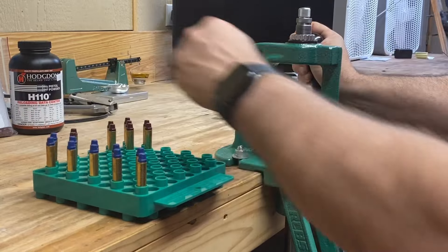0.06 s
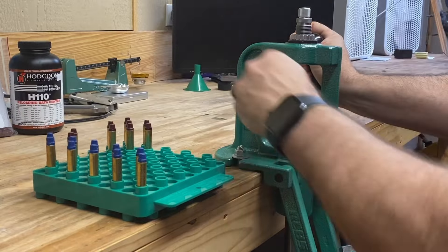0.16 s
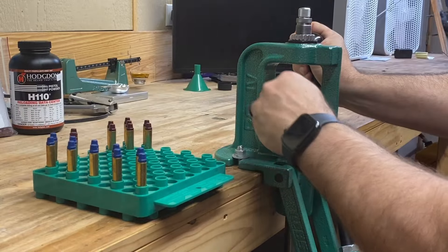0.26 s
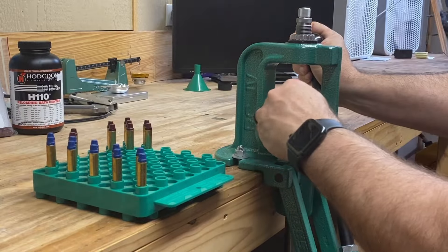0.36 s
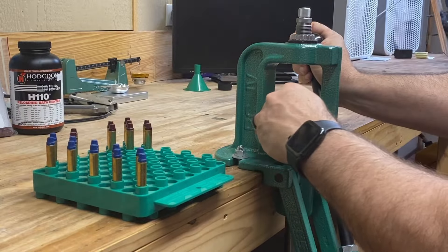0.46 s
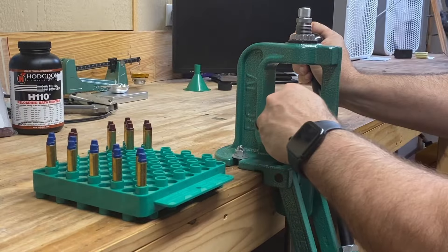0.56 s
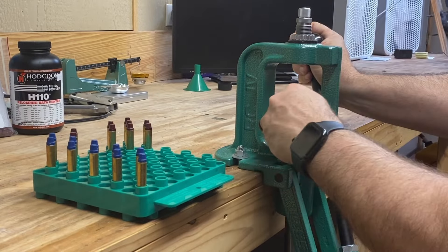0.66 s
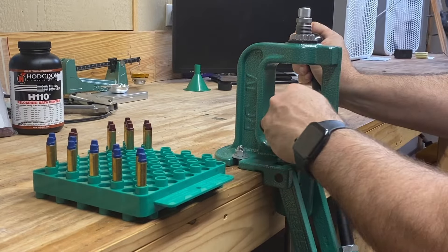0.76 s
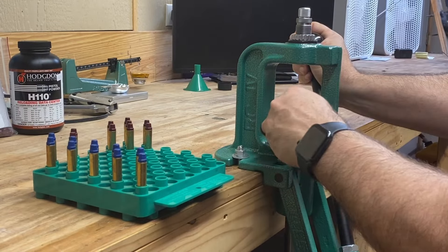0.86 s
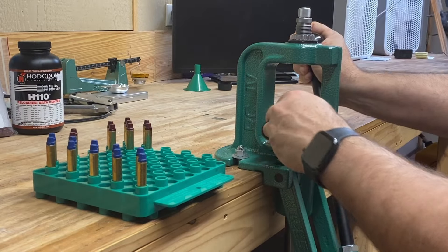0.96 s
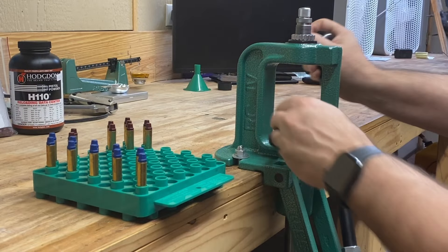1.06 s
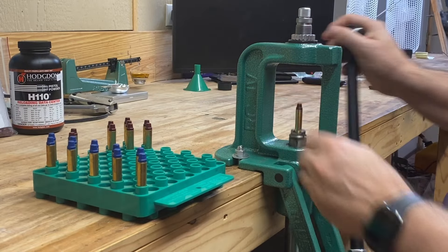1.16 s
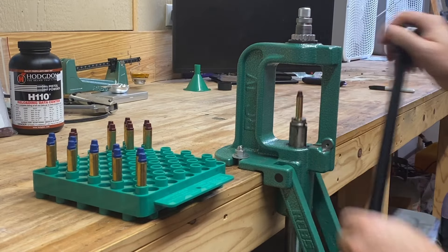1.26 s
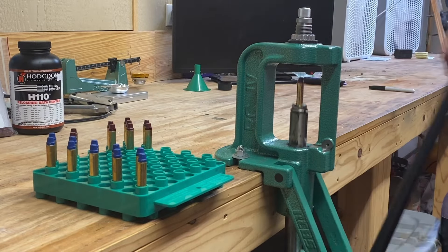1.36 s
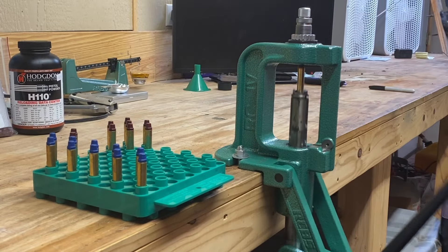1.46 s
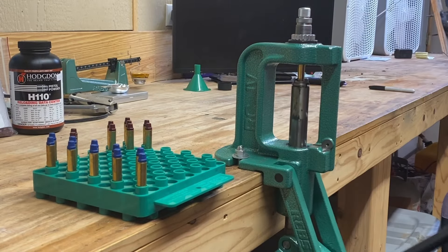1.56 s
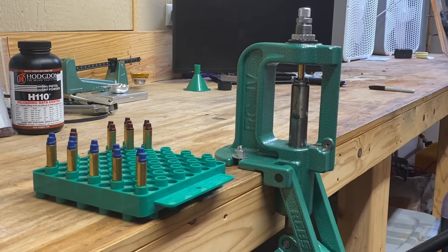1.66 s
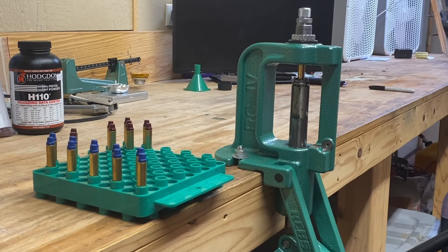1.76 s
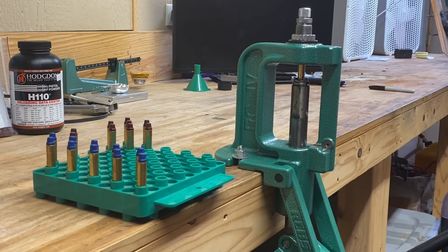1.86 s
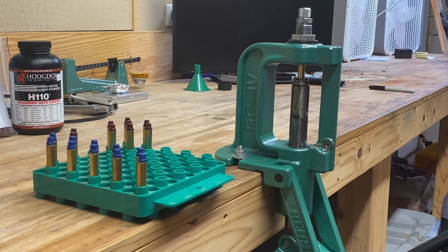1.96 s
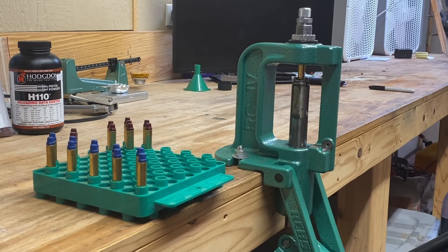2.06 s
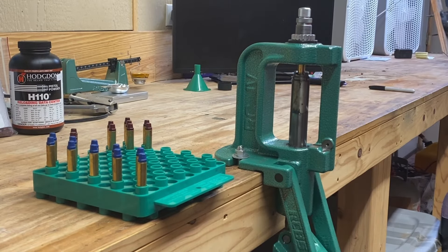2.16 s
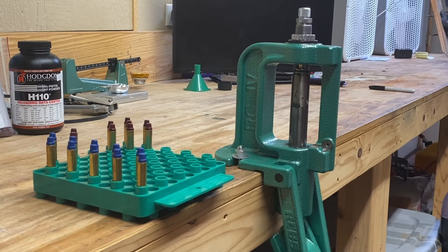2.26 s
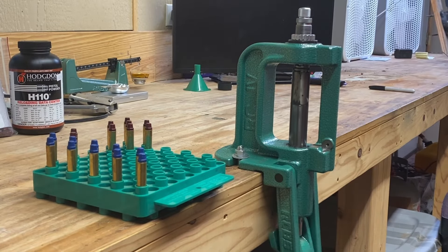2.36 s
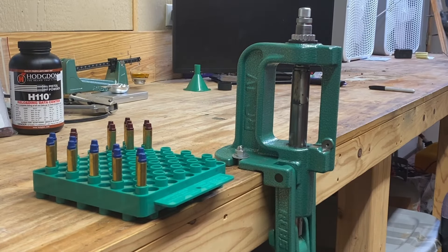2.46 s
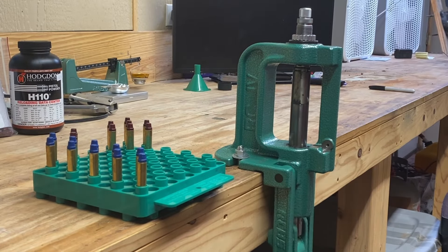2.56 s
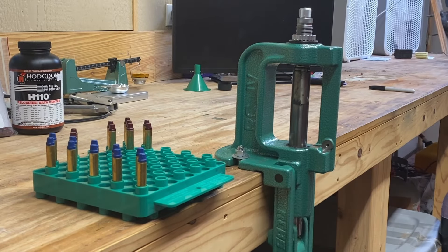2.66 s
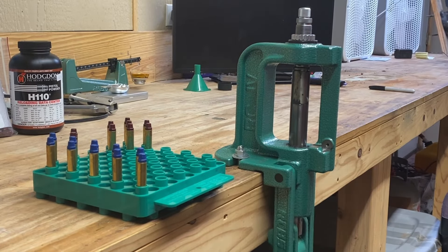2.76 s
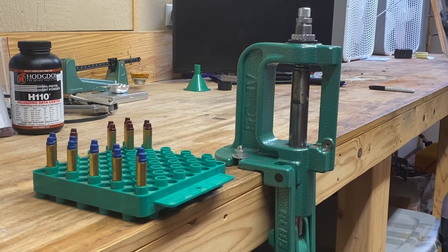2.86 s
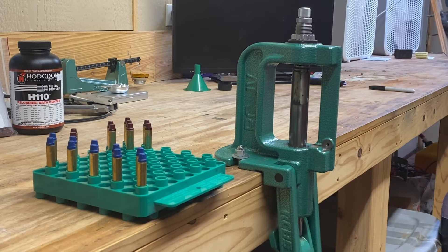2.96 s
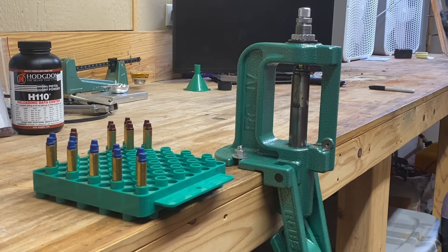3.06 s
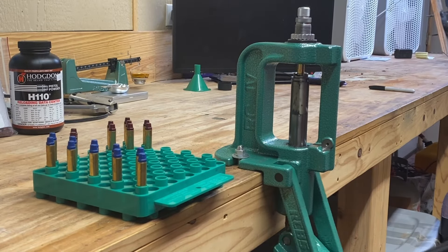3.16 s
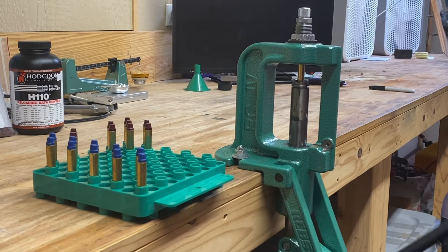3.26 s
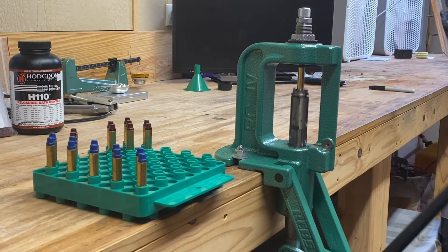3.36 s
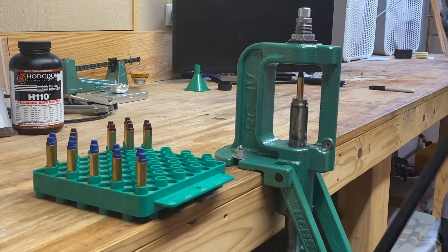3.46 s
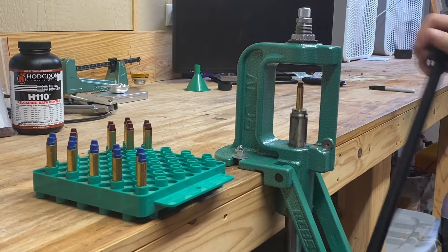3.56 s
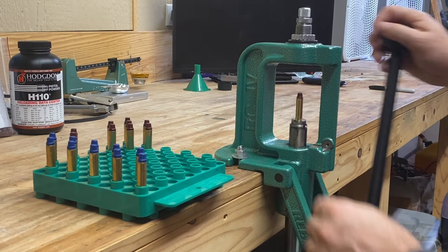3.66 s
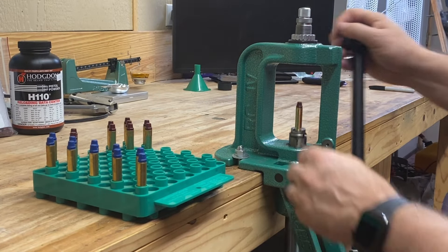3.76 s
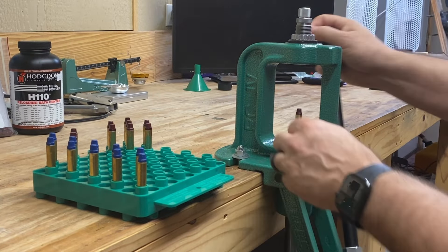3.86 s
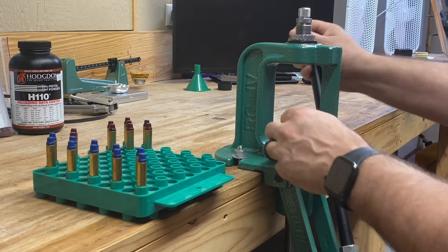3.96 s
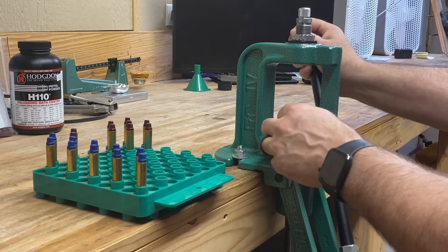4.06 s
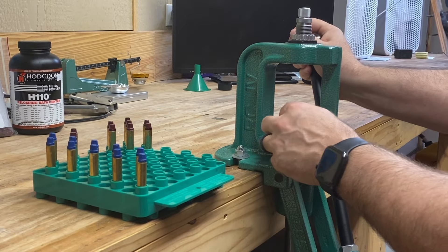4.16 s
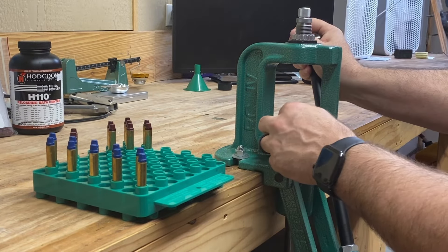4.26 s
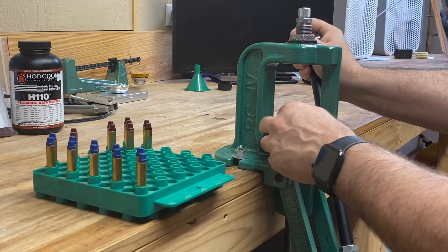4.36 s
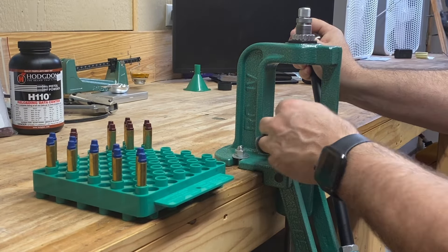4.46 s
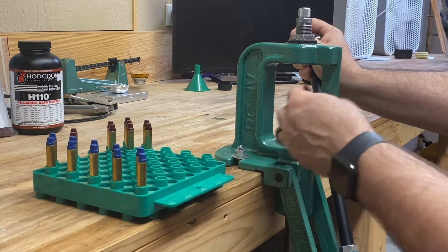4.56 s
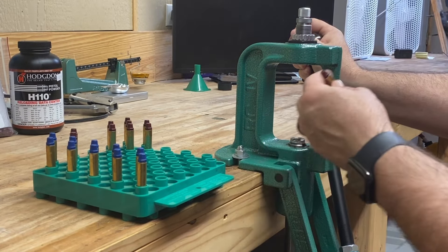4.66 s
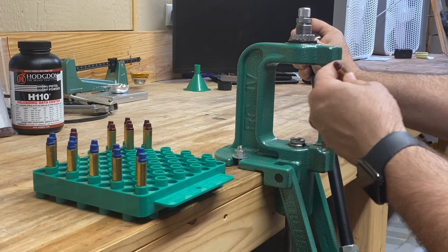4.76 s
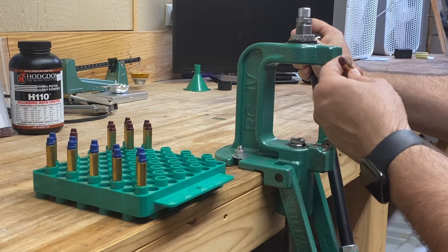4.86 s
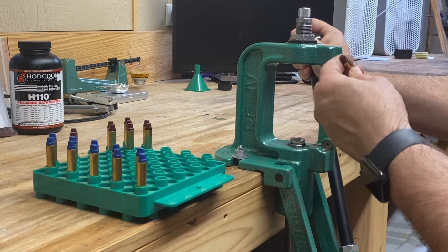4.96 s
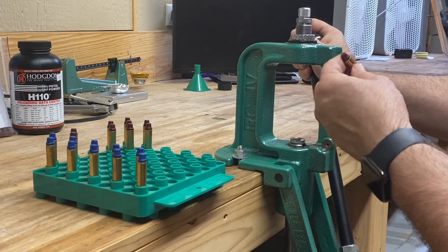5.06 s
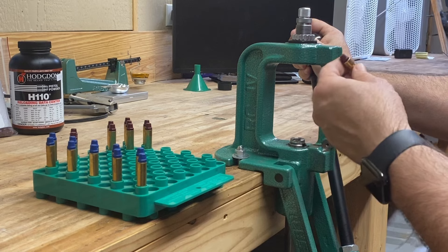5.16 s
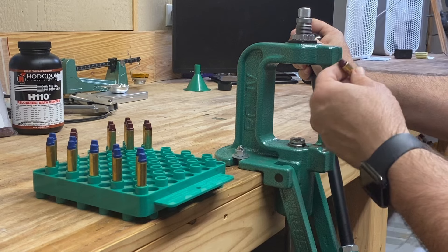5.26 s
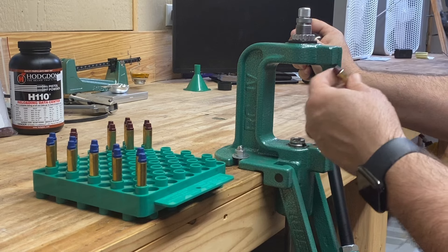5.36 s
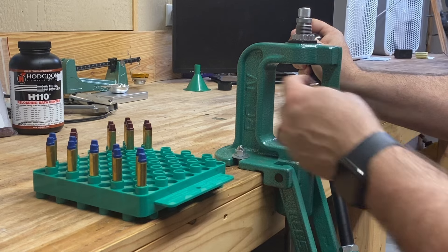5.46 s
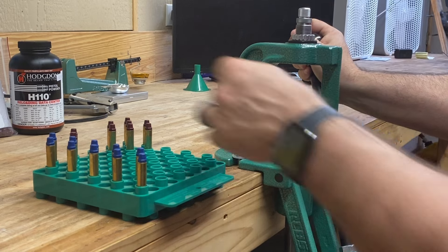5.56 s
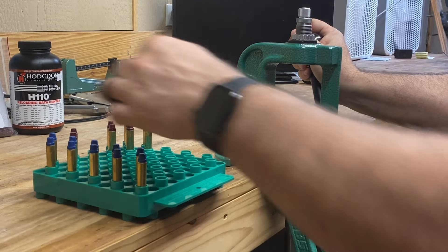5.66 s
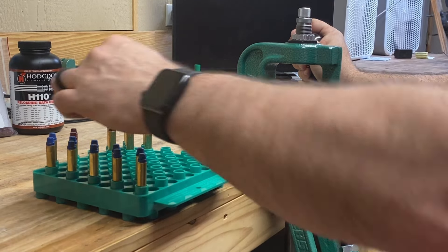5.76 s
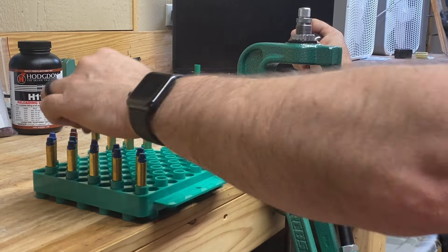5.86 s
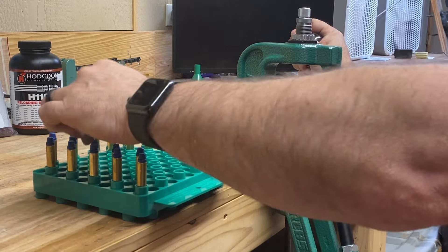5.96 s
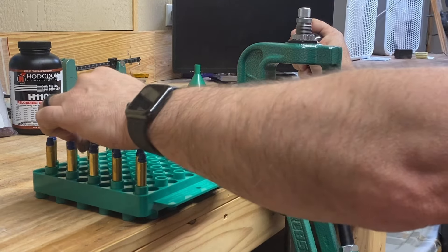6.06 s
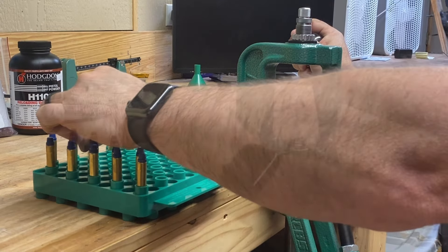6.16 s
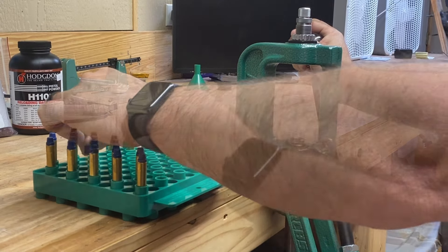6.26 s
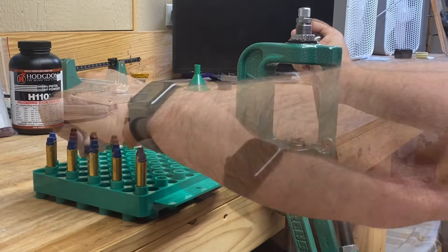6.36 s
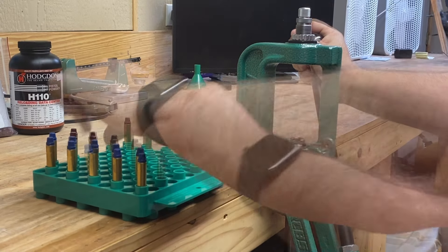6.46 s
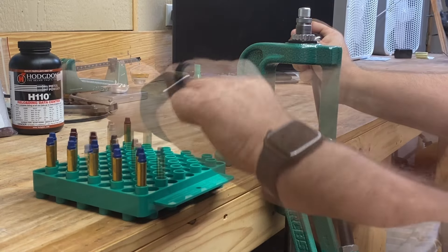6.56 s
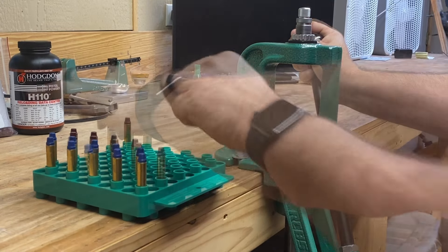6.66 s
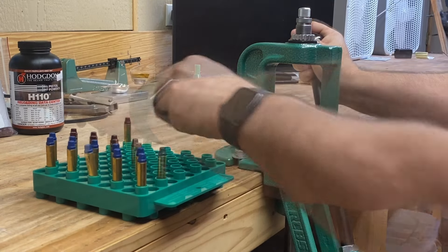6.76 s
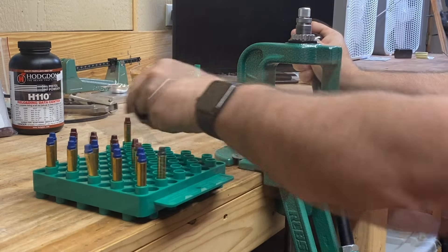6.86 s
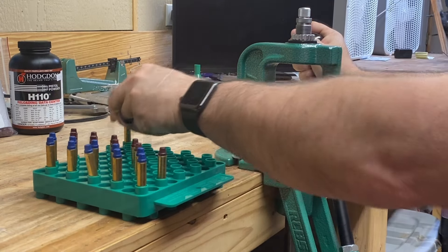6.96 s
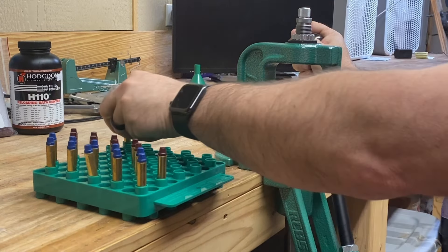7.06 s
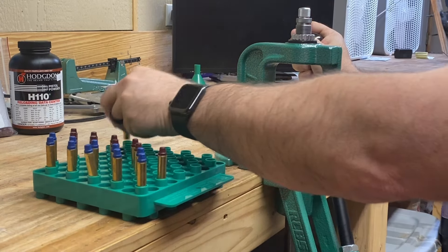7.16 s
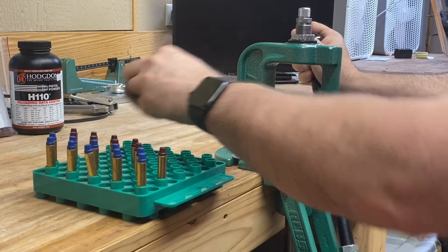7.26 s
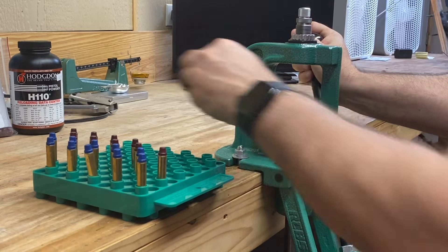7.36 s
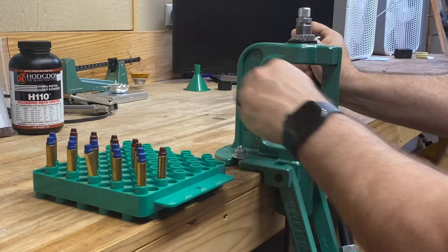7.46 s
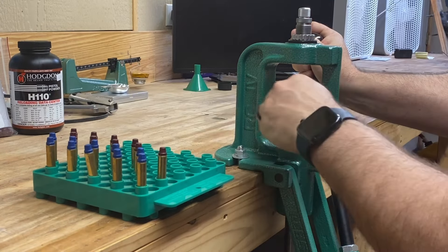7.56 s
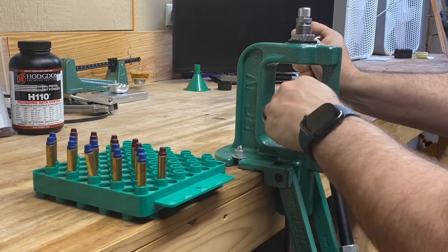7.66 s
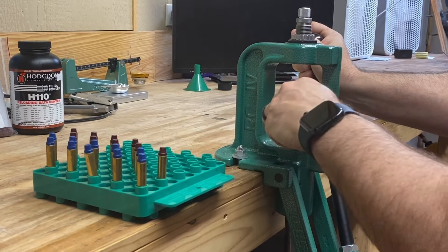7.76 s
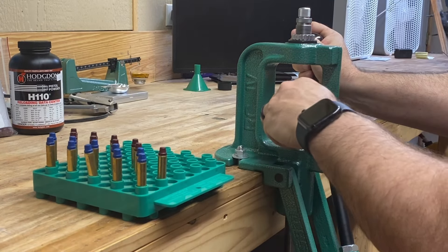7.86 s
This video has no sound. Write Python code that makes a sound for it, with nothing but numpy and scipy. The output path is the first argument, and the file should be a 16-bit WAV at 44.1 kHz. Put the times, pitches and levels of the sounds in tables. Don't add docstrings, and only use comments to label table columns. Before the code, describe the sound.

Close to a wooden bench, light hollow nudges and brass ticks lead into two rounds of loose iron clunking, with dull plank thuds and a barely audible sliding hiss between them. A cartridge case is pulled free with small scrapes, then knocks into a hard plastic tray around six seconds. Soft taps and a last metallic tick end it. A steady fan rumbles throughout in a small, lightly echoing workshop.

```python
import sys
import numpy as np
from scipy import signal
from scipy.fft import rfft, irfft, next_fast_len
from scipy.io import wavfile
from scipy.ndimage import uniform_filter1d

SR = 44100
rng = np.random.default_rng(int(sys.argv[2]) if len(sys.argv) > 2 else 0)


def undo_db(level):
    steps = np.asarray(level, float) / 20
    return 10 ** steps


def digitize_waveform(pressure):
    field = np.atleast_2d(pressure).T
    bounded = np.clip(field, -1, 1)
    quanta = np.round(bounded * 32767).astype(np.int16)
    wavfile.write(sys.argv[1], SR, quanta)


N = 349272
TIME = np.arange(N) / SR

KNOCKS = [(1.053, -35.5, -68, 2440, 10.5), (1.059, -33, -87, 1660, 6), (1.362, -44, -52, 1300, 2),
          (1.600, -44.5, -54.5, 2800, 13), (2.23, -21.5, -52, 790, 8), (2.232, -22.5, -58, 1260, 15),
          (2.264, -43, -70, 807, 14), (2.36, -44, -55.5, 1080, -1), (2.382, -36, -62, 1310, 6),
          (2.441, -44, -77, 730, 10), (2.573, -37, -68, 2220, 12), (2.581, -38, -74, 770, 4),
          (3.162, -19.5, -36.5, 1650, 15.5), (3.156, -23, -36, 2370, 17), (3.209, -29.5, -58, 1250, 11.5),
          (3.224, -17.5, -45, 2200, 10), (3.197, -27, -35.5, 3900, 13.5), (3.256, -29, -40, 2930, 14),
          (3.302, -36.5, -59.5, 2300, 10.5), (3.232, -25, -53, 1250, 13.5), (3.246, -20, -37, 2930, 15.5),
          (3.289, -30, -42, 810, 10), (3.429, -43.5, -60, 840, 6), (3.614, -56.5, -62.5, 2780, 13),
          (3.974, -30, -65, 842, 12), (3.997, -41, -65, 1650, 10), (4.012, -39, -67, 1000, 6)]
SLACK = [
    (1.003, -55, -76, 2270, 13),
    (1.614, -34, -66.5, 1650, 1.9),
    (2.15, -37, -71, 1500, 10),
    (2.169, -42, -65, 834, 10),
    (2.209, -24, -50, 835, 3.7),
    (3.149, -34, -40.5, 3070, 22),
    (3.194, -22.5, -44.5, 820, 9.2),
    (3.55, -51.5, -75, 1760, 7.8),
    (3.969, -32.5, -60.5, 1400, 12),
    (3.984, -36, -77, 1650, 10),
]
TICKS = [(0.461, -39.5, -45, 3050, 1.2), (0.585, -46, -81, 1805, 18), (0.605, -45.5, -55, 2170, 12),
         (0.635, -47, -65, 3000, 12), (0.648, -46, -66, 3000, 8), (0.719, -42, -70, 2190, 12),
         (0.756, -49, -65, 2200, 10), (0.6012, -37, -49, 2950, 7.2), (0.678, -48, -80, 1770, 20),
         (0.714, -39, -65, 2190, 8.2), (0.7449, -40.5, -51.5, 3100, 12), (4.2065, -38, -52.5, 3040, 2.6),
         (4.2095, -38.5, -60, 2020, 5.9), (4.273, -54, -64, 2040, 3.6), (4.296, -47, -65, 2500, 5),
         (4.315, -41, -71, 2880, 8), (4.335, -50, -68, 2000, 8), (4.372, -39.5, -71, 1810, 7.8),
         (6.8224, -48.5, -82, 2450, 3.8), (6.83, -51.5, -84, 1610, 8.8), (7.8028, -35.5, -63, 2800, 5),
         (7.8065, -34, -73, 1880, 8.7)]
TAPS = [(6.193, -26.5, -62, 810, 3.1), (6.194, -28, -70, 740, 9.4), (6.215, -34, -80, 800, 5.3),
        (6.334, -31, -63, 1290, 7), (6.346, -34.5, -87, 790, 6), (6.361, -29.5, -57, 1290, 1.8),
        (6.363, -36.5, -67, 3040, 7.2), (7.087, -50, -74, 2990, 5.3), (7.091, -38.5, -76, 810, 14),
        (7.103, -45, -93, 805, 8), (7.125, -42, -77, 1150, 9), (7.17, -45.5, -68, 3100, 15),
        (7.139, -35.5, -65.5, 1180, 17), (7.148, -35, -67, 1300, 21), (7.178, -46, -84, 1270, 9.2),
        (7.144, -40, -63, 2700, 10)]
DROP = [
    (6.038, -18, -46.5, 2350, 9.9),
    (6.040, -18.5, -53, 803, 12),
    (6.041, -18, -48, 1283, 9),
    (6.039, -19.5, -45, 3040, 11),
]
NUDGES = [
    (0.1225, -37, -90, 1240, 14),
    (0.326, -41.5, -83, 1090, 15),
    (0.529, -48, -90, 1050, 10),
    (0.873, -45.5, -87, 1290, 4),
    (6.852, -57.5, -90, 1240, 11),
    (6.871, -54, -88, 1280, 11),
]

# start_s, level_db, pitch_hz
THUDS = [(1.062, -31.5, 300), (1.072, -28, 130.3), (1.099, -44.5, 167), (1.12, -37, 92), (1.619, -27, 312),
         (1.628, -29.5, 137), (1.651, -33, 130), (1.68, -34.5, 91), (2.584, -24.5, 247),
         (2.158, -29.5, 264), (2.172, -28, 129.3), (2.227, -16.5, 150.3), (2.239, -23, 152.3),
         (2.253, -26, 123), (2.399, -28, 148), (2.469, -36.5, 72), (2.589, -23.5, 87.8),
         (2.623, -36.5, 180), (2.649, -30.5, 84.6), (3.165, -15.5, 326), (3.172, -22, 99),
         (3.193, -19.5, 319), (3.214, -12.5, 129), (3.235, -19, 97.6), (3.249, -16.5, 284),
         (3.263, -20.5, 160), (3.265, -17.5, 331), (3.184, -23, 180), (3.289, -27, 97), (3.957, -43, 300),
         (3.974, -31.5, 214), (3.998, -33.5, 463), (3.995, -28, 56), (4.011, -34, 140), (3.985, -35, 345)]
TUGS = [
    (4.31, -41, 584),
    (4.35, -38, 595),
]
# start_s, level_db, pitch_hz
PINGS = [(0.215, -56, 10900), (0.463, -43, 6760), (2.179, -63, 11600), (3.154, -35, 14700),
         (3.155, -29, 10200), (3.1545, -44, 7700), (4.272, -54, 8500), (4.367, -56, 6330),
         (6.031, -57, 2780), (6.0375, -50.5, 15020), (6.1923, -53, 14800), (7.15, -63, 7900),
         (7.147, -59, 5600), (7.164, -61, 5700)]

# full_s (time of full strength), swell_s, hold_s, level_db
RIM = [
    (0.49, 0.023, 0.02, -58),
    (0.59, 0.013, 0.0089, -60),
    (0.606, 0.0047, 0.074, -55.5),
    (0.712, 0.016, 0.054, -55.5),
    (4.305, 0.061, 0.039, -48.5),
    (7.83, 0.022, 0.038, -58),
]
DRAG = [
    (6.372, 0.0026, 0.0078, -66),
    (6.87, 0.025, 0.012, -58),
    (7.138, 0.016, 0.012, -47.5),
    (7.168, .01, 0.01, -61),
]
RAM = [
    (1.224, 0.13, 0.33, -71.5),
    (2.382, .04, 0.25, -72.5),
    (2.928, .09, 0.064, -76),
]
DIE = [
    (2.47, .12, 0.12, -81.5),
    (2.92, 0.11, 0.068, -82.5),
]
RATTLE = [
    (2.215, 0.013, 0.011, -36),
    (3.163, 0.0077, 0.0053, -30),
    (3.2, 0.018, 0.062, -36),
]

# pitch_hz, width_hz (wider dies sooner), level_db
BENCH = [(48.5, 5, 0), (66, 15, -3.5), (84, 11, -8), (99, 8.3, -2.5), (122, 32, -11.5), (140.2, 20, -1),
         (180, 15, -0.5), (226, 14, -3.5), (267, 10, -5.5), (306.4, 18, -8), (345, 8, -8.5), (451, 20, -10),
         (514, 30, -13.5), (600, 59, -9)]
FRAME = [(858, 22, 11), (1240, 67, -6), (1650, 42, 14.5), (2040, 60, -23), (2260, 31, -8),
         (2820, 160, -11.5), (3670, 6.7, -34.5)]
HOLDER = [(1510, 32, -16), (1804, 46, 3.5), (2000, 42, -10), (2182, 44, 8.5), (2510, 53, -3),
          (2700, 60, -11), (2990, 57, 6.5), (3270, 52, -23), (4100, 35, -11)]
BLOCK = [(721, 24, -6), (799, 16, -4), (840, 27, -8), (930, 31, -6), (1150, 31, -0.5), (1285, 54, 4),
         (1420, 40, -3.5), (1660, 49, 2), (2020, 45, -2.5), (2255, 27, -3), (2260, 90, 0),
         (2500, 70, -11.5), (2732, 60, -10), (3084, 74, -3.5)]
BLOCK_DROPPED = [(812, 15.7, 6.5), (890, 20, -9.5), (1100, 25, -9.5), (1260, 28, 2.5), (1430, 45, -12),
                 (1650, 35, -5), (2036, 22, -2.5), (2294, 30, -2), (2370, 46, -5.5), (2654, 30, -9),
                 (2750, 50, -10.5), (3040, 35, 0.5), (3390, 60, -21)]
POCKET = [(1063, 19, -7), (1142, 14, -3), (1240, 74, 2), (1290, 41, -7), (1655, 77, 0), (2340, 90, -8)]

# pitch_hz, level_db (per hertz)
IRON_BODY = [(240, -43), (400, -3), (566, -5.5), (1050, -12), (1200, -12.5), (1800, -14), (2020, -13),
             (4000, -28), (5200, -56.5), (8800, -120)]
IRON_CRACK = [(2060, -19), (3500, -12.5), (4510, -3.5), (7560, -17.5), (9090, -33.5), (10400, -24.5),
              (13500, -40), (16000, -25.5)]
BRASS_BODY = [(710, -8), (1200, -16), (1770, 0.5), (1920, -7), (2130, 0), (2960, -1), (3450, -9),
              (5200, -20), (7150, -60), (12100, -120)]
BRASS_CRACK = [(2060, -42), (3500, -2.5), (5600, -7), (6870, 3.5), (8800, -12.5), (10100, -4), (11600, -23),
               (13400, -53), (16000, -7.5)]
PLASTIC_BODY = [(560, -51), (680, -27), (811, -5.5), (966, -11), (1270, -8.5), (1800, -10), (3050, -14.5),
                (3400, -34), (5200, -52.5), (8800, -120)]
PLASTIC_CRACK = [(2060, -27.5), (3500, 2.5), (4080, -10), (5190, -9.5), (7650, -23), (8580, -42.5),
                 (13200, -33), (14500, -30.5), (16000, -37)]
DROPPED_BODY = [(350, -40.5), (720, -33), (805, -10.5), (966, -18), (1270, -12.5), (1800, -13), (3050, -14),
                (3400, -30)]
POCKET_BODY = [(500, -38), (900, -3), (1200, 4), (1700, -11), (2400, -11.5), (3200, -39), (6000, -70)]
DRAG_BODY = [(350, -10), (600, -20.5), (936, -10.5), (1040, -12), (1310, -3.5), (1700, -22), (2210, -24),
             (2410, -4.5), (4000, -45), (5200, -64), (8800, -120)]
DRAG_HISS = [(2060, -33), (3500, -12), (5820, 2), (8310, -26), (9260, -47), (9440, -32), (14400, 3),
             (16000, -37)]
RIM_HISS = [(2060, -15), (3500, -6), (6910, -11), (8470, -36), (9050, -48), (10300, -26), (13000, -44)]
RAM_HISS = [(710, -32), (1200, -1.5), (3220, -6.5), (4960, -7.5), (7570, -13.5), (8910, -20), (10800, -22),
            (16000, -22.5)]
DIE_HISS = [(1500, -28.5), (4000, -3), (7000, 2), (11000, 0), (15000, 1), (16500, -10.5)]
AIR = [(15, -46), (25, -22), (36, -10), (59, -1), (176, -6), (205, -13), (266, -8), (296, -4.5), (383, -14),
       (472, -15), (794, -22), (1080, -25.5), (2130, -38.5), (3600, -46.5), (12500, -55.5), (16200, -96),
       (22000, -120)]

KNOCK_FEEL = (6.5, 0.84, 0.15)
SLACK_FEEL = (13.5, 0.76, 0.34)
TICK_FEEL = (3.33, 0.71, 0.044)
TAP_FEEL = (3.47, 1.1, 0.79)
DROP_FEEL = (3.07, 1.1, 0.7)
NUDGE_FEEL = (1.85, 0.1, 0.01)

# pitch_hz, level_db
HUM = [(118.4, -67), (161.5, -69.5), (183.0, -61.5), (236.9, -68), (301.5, -65.5), (479.1, -72),
       (597.5, -77), (1066, -80), (1125, -93.5)]
# time_s, level_db
AIR_SWELL = [(0, 0.5), (2, 0), (4, 0.5), (6.1, -1.5), (6.55, -4), (7, -1), (7.92, -0.5)]
# pitch_hz, t60_s (time to fall 60 dB), level_db
ROOM = [(60.4, 0.6, -6.5), (240, 0.39, -3.5), (910, 0.38, -1), (2580, 0.4, -6.5), (5100, 0.32, -3),
        (7780, 0.43, -4.5), (14000, 0.2, -0.5)]
# pitch_hz, level_db
PORT_SUM = [(15, -26.5), (45, -0.5), (7500, -1.5), (8600, -4.5), (9050, -31), (9500, -3), (12300, 2.5),
            (13200, -34.5), (13900, -3), (15700, -3.5), (16200, -42.5)]
# pitch_hz, level_db
PORT_SIDE = [(15, -40), (50, -10), (200, -11.5), (400, -4.5), (700, -4.5), (1300, 0), (2400, -12.5),
             (4400, -18.5), (6800, -17), (8200, 0.5), (10000, 4), (11300, -22.5), (12500, 8), (14400, -5.5),
             (15000, -39.5)]

IRON_RISE, BRASS_RISE, PLASTIC_RISE = 0.55, 0.8, 0.45


def unit(x):
    return x / np.sqrt(np.mean(x ** 2))


def colour(x, table):
    hz, db = np.transpose(table)
    size = next_fast_len(x.shape[-1])
    log_hz = np.log(np.arange(size // 2 + 1) * SR / size + 1)
    gain = undo_db(np.interp(log_hz, np.log(hz), db))
    return irfft(rfft(x, size) * gain, size)[..., :x.shape[-1]]


def noise_like(table):
    return unit(colour(rng.standard_normal(N), table))


def add(out, s, x):
    i = int(s * SR)
    out[i:i + len(x)] += x[:N - i]


def walk(rate):
    k = int(SR / rate)
    steps = np.repeat(rng.standard_normal(N // k + 1), k)
    return uniform_filter1d(uniform_filter1d(steps, k), k)[:N]


def ring(peaks, damping, scatter_db, near_hz, favour_db, tilt_db=0):
    hz, width, db = np.transpose(peaks)[:, :, None]
    detune, phase, share = rng.standard_normal((3, len(peaks), 1))
    t = TIME[:SR // 4]
    modes = np.sin(2 * np.pi * hz * (1 + 0.0043 * detune) * t + 2 * phase)
    modes = modes * np.exp(-np.pi * damping * width * t)
    favour = favour_db * np.exp(-(np.log(hz / near_hz) / 0.13) ** 2)
    db = db + scatter_db * share + favour + tilt_db * np.log2(hz / near_hz)
    y = np.sum(width * undo_db(db) * modes, axis=0)
    y = y * (1 - np.exp(-t * near_hz / 0.88))
    return y / np.abs(y).max()


def burst(table, fall_s, rise, tilt_db=0, struck=((1, 0),)):
    t = TIME[:SR // 4] / fall_s
    shape = (1 - np.exp(-t / rise)) * np.exp(-t)
    noise = rng.standard_normal(len(t))
    for _ in range(2):
        stirred = uniform_filter1d(np.abs(rfft(noise * shape)) ** 2, size=30)
        noise = irfft(rfft(noise) / np.sqrt(stirred + stirred.mean() / 20), len(t))
    tilted = [(hz, db + tilt_db * np.log2(hz / 1000)) for hz, db in table]
    sound = unit(colour(colour(noise, tilted), struck) * shape)
    return sound * np.sqrt(np.mean(shape ** 2)) / shape.max()


def hits(events, feel, peaks, body, crack, damping, rise, ring_db, body_db, crack_db):
    out = np.zeros(N)
    chatter_ms, base_tilt_db, tilt_change_db = feel
    fall_s = chatter_ms / 1000
    swell = 1 - np.exp(-TIME[:SR // 4] / (rise * fall_s))
    for s, db, top_db, hz, lead_db in events:
        tilt_db = base_tilt_db + tilt_change_db * (top_db - db + 26)
        clear = ring(peaks, damping, 0.84, hz, 0.88 * lead_db, tilt_db) * swell
        struck = [(hz / 1.22, 0), (hz, lead_db), (hz * 1.22, 0)]
        dense = burst(body, fall_s, rise, tilt_db, struck)
        bright = burst(crack, 0.51 * fall_s, rise)
        add(out, s, undo_db(db + ring_db) * clear + undo_db(db + body_db) * dense + undo_db(top_db + crack_db) * bright)
    return out


def stroke(moves, fade_db_s):
    gain = 0
    for s, swell_s, hold_s, db in moves:
        before_db = 13 * np.clip(s - TIME, 0, None) / swell_s
        after_db = fade_db_s * np.clip(TIME - s - hold_s, 0, None)
        gain = gain + undo_db(db - before_db - after_db)
    return uniform_filter1d(gain, size=300)


def scrape(gain, peaks, body, crack, rate, spread_db, ring_db, crack_db):
    jerk_db = spread_db * np.minimum(rng.exponential(size=N), 2)
    slips = (rng.random(N) < rate / SR) * undo_db(jerk_db)
    shake = unit(signal.lfilter([1], [1, -np.exp(-1 / (0.0037 * SR))], slips)) * gain
    noise = noise_like(body) + undo_db(crack_db) * noise_like(crack)
    modes = ring(peaks, 0.6, 1.5, 2000, 0)
    modes = modes / np.sqrt(np.sum(modes ** 2))
    notes = signal.fftconvolve(shake * rng.standard_normal(N), modes)[:N]
    return shake * noise + undo_db(ring_db) * notes


def fan():
    air = unit(colour(rng.standard_normal((2, N)), AIR)) * undo_db(-55 + 0.39 * walk(6.6))
    width_hz = 3.5
    f = np.arange(N // 2 + 1) * SR / N
    lines = sum(undo_db(db - 0.5) / (1 + ((f - hz) / width_hz) ** 2) for hz, db in HUM)
    hum = irfft(rfft(rng.standard_normal((2, N))) * lines, N) * np.sqrt(SR / (np.pi * width_hz))
    return (air + hum) * undo_db(np.interp(TIME, *np.transpose(AIR_SWELL)))


def room(x):
    t, tails = TIME[:SR * 2 // 3], 0
    log_hz = np.log(np.arange(len(t) // 2 + 1) * SR / len(t) + 1)
    for (hz, t60, db), one in zip(ROOM, np.eye(len(ROOM))):
        band = np.sqrt(np.interp(log_hz, np.log(np.array(ROOM)[:, 0]), one))
        noise = irfft(rfft(rng.standard_normal((2, len(t)))) * band, len(t))
        tails = tails + noise * undo_db(db - 60 * t / t60) / np.sqrt(t60 * SR)
    lines = rfft(tails)
    power = np.abs(lines) ** 2
    even = np.sqrt(uniform_filter1d(power, size=150) / uniform_filter1d(power, size=16))
    tails = irfft(lines * even, len(t)) * np.clip((0.5 - t) / 0.2, 0, 1)
    tails = tails * (1 - np.exp(-t / 0.0031)) * undo_db(11.5)
    wet = signal.fftconvolve(x[None], tails, axes=1)[:, :N]
    return wet + x * np.array([[1], [0.7]])


def pings():
    out = np.zeros(N)
    for s, db, hz in PINGS:
        narrow = [(0.36 * hz, -30), (hz, 0), (1.4 * hz, -25)]
        add(out, s, undo_db(db) * burst(narrow, 0.00064, 0.05))
    return out


def plastic_block():
    taps = hits(TAPS, TAP_FEEL, BLOCK, PLASTIC_BODY, PLASTIC_CRACK, damping=0.83, rise=PLASTIC_RISE,
                ring_db=-4, body_db=-5.5, crack_db=3)
    drop_body = DROPPED_BODY + PLASTIC_BODY[-2:]
    drop = hits(DROP, DROP_FEEL, BLOCK_DROPPED, drop_body, PLASTIC_CRACK, damping=1.22, rise=BRASS_RISE,
                ring_db=-7.5, body_db=-5, crack_db=4.9)
    drag = scrape(stroke(DRAG, fade_db_s=513.5), BLOCK, DRAG_BODY, DRAG_HISS, rate=800, spread_db=8.9,
                  ring_db=-18, crack_db=-24)
    nudges = hits(NUDGES, NUDGE_FEEL, POCKET, POCKET_BODY, PLASTIC_CRACK, damping=0.85, rise=PLASTIC_RISE,
                  ring_db=-7.5, body_db=-7.5, crack_db=0.1)
    return taps + drop + drag + nudges


def brass_in_holder():
    ticks = hits(TICKS, TICK_FEEL, HOLDER, BRASS_BODY, BRASS_CRACK, damping=0.66, rise=BRASS_RISE,
                 ring_db=-5.5, body_db=-6.5, crack_db=0.29)
    rim = scrape(stroke(RIM, fade_db_s=299), HOLDER, BRASS_BODY, RIM_HISS, rate=900, spread_db=2,
                 ring_db=-14, crack_db=-31)
    return ticks + rim


def ram():
    bore = stroke(RAM, fade_db_s=350) * noise_like(RAM_HISS)
    die = stroke(DIE, fade_db_s=600) * noise_like(DIE_HISS)
    return undo_db(4 + 0.33 * walk(25)) * (bore + die)


def bench():
    out = np.zeros(N)
    passed_on = [(tap[0], tap[1] - 18.5, 430) for tap in TAPS + DROP[1:2]]
    for s, db, hz in THUDS + TUGS + passed_on:
        push = np.hanning(3 + int(0.13 * SR / hz))
        boom = ring(BENCH, damping=2.37, scatter_db=0.71, near_hz=hz, favour_db=12.5)
        add(out, s, undo_db(db) * signal.fftconvolve(boom, push / push.sum()))
    return out


def linkage():
    iron = dict(peaks=FRAME, body=IRON_BODY, crack=IRON_CRACK, damping=1.7, rise=IRON_RISE,
                ring_db=-10, body_db=-9, crack_db=-1.3)
    rattle = scrape(stroke(RATTLE, fade_db_s=262.5), FRAME, IRON_BODY, IRON_CRACK, rate=400, spread_db=5.1,
                    ring_db=-20, crack_db=-17.5)
    return hits(KNOCKS, KNOCK_FEEL, **iron) + hits(SLACK, SLACK_FEEL, **iron) + undo_db(-5) * rattle


def scene():
    press = linkage() + bench() + ram()
    cases = brass_in_holder() + plastic_block() + pings()
    return room(press + cases) + fan()


def roll_off(x):
    return signal.sosfilt(signal.butter(12, 16710, fs=SR, output="sos"), x)


def record(dry):
    mid, side = colour(dry[0], PORT_SUM), colour(dry[1], PORT_SIDE)
    side = signal.hilbert(side, next_fast_len(N)).imag[:N]
    side = side + 0.04 * mid
    return roll_off(np.array([mid + side, mid - side]))


dry = scene()
out = record(dry)
digitize_waveform(out)
```